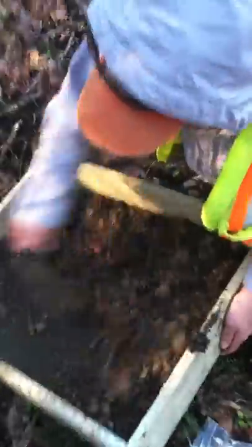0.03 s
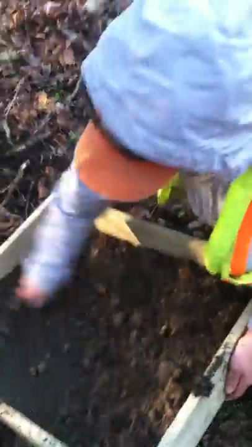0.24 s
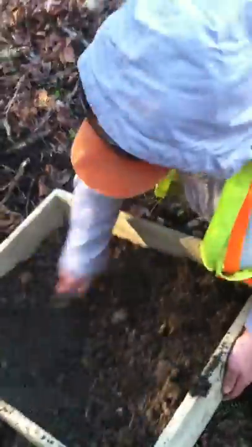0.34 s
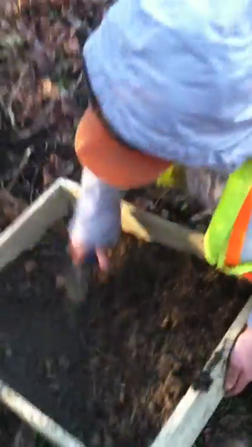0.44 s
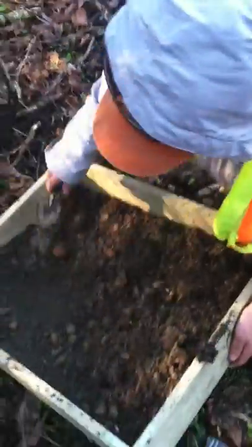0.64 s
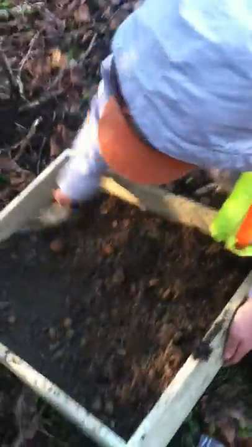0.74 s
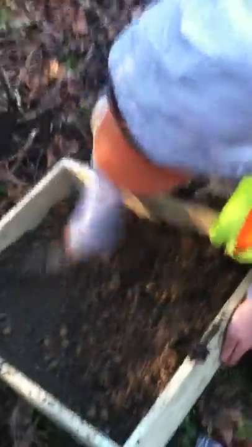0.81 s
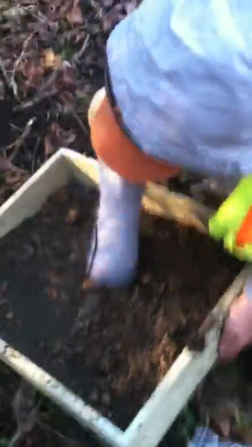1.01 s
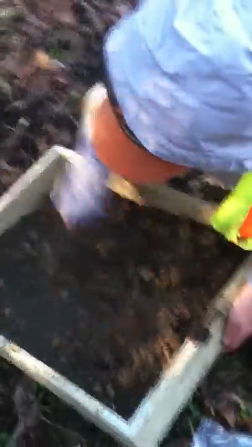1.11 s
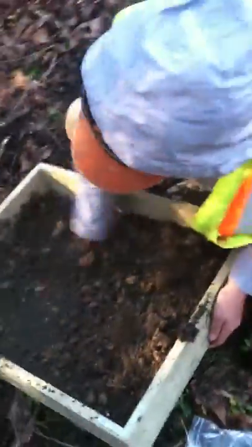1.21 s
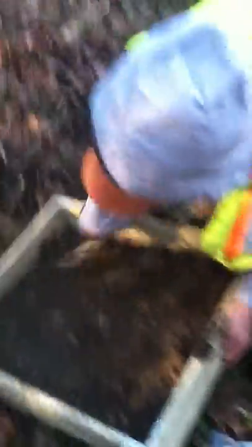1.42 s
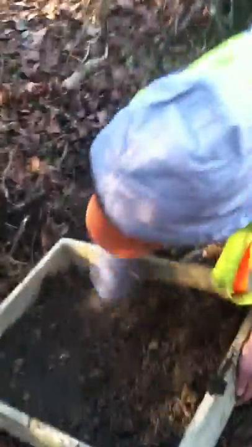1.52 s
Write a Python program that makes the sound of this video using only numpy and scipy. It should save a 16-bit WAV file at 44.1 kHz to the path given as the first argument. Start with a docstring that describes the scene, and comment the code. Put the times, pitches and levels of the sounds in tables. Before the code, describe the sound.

A hand rubs soil across a wood-framed wire screen outdoors. A dull thump at 0.2 seconds leads into a short, hard push at 0.3, crunching crumbs and cracking clods as the screen hums hollowly. A few grains tick in the lull from 0.4 to 0.8. Two longer scraping, rasping sweeps follow at about 0.9 and 1.2, the second softer, fading by 1.4. A distant engine rumbles faintly throughout.

```python
"""Outdoors, over the faint rumble and hum of a far idling engine, a hand rubs damp soil across a wire
screen in a wooden frame. Friction of grit on the mesh excites the screen's modes, which hum hollowly.
First a dull thump rings the screen, and a short hard push crushes crumbs and cracks clods on the wires.
In the lull a few grains tick. Two longer sweeps follow, scraping, crunching and rasping."""
import sys
import numpy as np
from scipy import signal
from scipy.fft import rfft, irfft, next_fast_len
from scipy.io import wavfile
from scipy.ndimage import uniform_filter1d, map_coordinates

SR = 44100
rng = np.random.default_rng(int(sys.argv[2]) if len(sys.argv) > 2 else 0)


def put_to_file(sound):
    """Save the sound as 16-bit audio at rate SR, in the file named by the first command-line argument."""
    columns = np.atleast_2d(sound).T  # one column per channel
    safe = np.clip(columns, -1, 1)
    whole_steps = np.round(safe * 32767)
    wavfile.write(sys.argv[1], SR, whole_steps.astype(np.int16))


N = 68355

# Contact spectra of coarse grit and of fine soil. Each row: frequency in Hz, relative level in dB.
GRIT_SPECTRUM = [(40, -15), (150, -13), (300, -8), (700, -12.5), (950, -6), (1250, -3), (1600, 0),
                 (1950, 3), (2300, 1), (2650, -5), (3050, -1), (3600, -4.5), (3950, -1), (4600, -4.5),
                 (5300, -3.5), (7500, -15.5), (15000, -45)]
SOIL_SPECTRUM = [(100, -50), (1500, -22.5), (3500, 0.5), (5200, -2.5), (7300, 1.5), (10000, 0.5),
                 (11800, -4), (13000, -12), (15500, -23)]
# Normal modes of the framed screen. Each row: frequency in Hz, relative level when struck in dB,
# time to decay by 60 dB in seconds, relative level when scraped in dB.
SCREEN_MODES = [(236, -20.5, 0.12, -11), (330.8, 2, 0.061, -2.5), (553.6, -15, 0.056, -0.5),
                (901.5, -9.5, 0.032, -6), (1220, -14.5, 0.017, -38), (1955, -26, 0.018, -25.5)]


def amp(db):
    """Amplitude ratio of a level in decibels."""
    return 10 ** (np.asarray(db) / 20)


def unit(x):
    """Normalisation to an rms of 1."""
    return x / np.sqrt(np.mean(x ** 2) + 1e-20)


def since(start):
    """Elapsed time in seconds, zero before the start."""
    return np.maximum(np.arange(N) / SR - start, 0)


def wobble(rate):
    """Smooth random modulation: a spline through `rate` knots a second."""
    return map_coordinates(rng.standard_normal(N // 20), [np.arange(N) * rate / SR], mode="wrap")


def filtered(x, response):
    """Linear filtering: the spectrum is multiplied by a frequency response."""
    size = next_fast_len(N + SR // 4)
    return irfft(rfft(x, size) * response(np.fft.rfftfreq(size, 1 / SR)), size)[:N]


def coloured(x, spectrum, size=4096):
    """Convolution with a minimum-phase pulse of unit energy and the given spectral shape."""
    hz, db = np.transpose(spectrum)
    log_hz = np.log(np.fft.rfftfreq(size, 1 / SR) + 1)
    cepstrum = irfft(np.log(amp(np.interp(log_hz, np.log(hz), db))))
    cepstrum[1:size // 2] *= 2  # folding the cepstrum makes the pulse causal
    cepstrum[size // 2 + 1:] = 0
    pulse = irfft(np.exp(rfft(cepstrum)))
    return signal.fftconvolve(x, pulse / np.linalg.norm(pulse))[:N]


def outdoors(rumble_db=-55.5):
    """A far engine's line spectrum, slightly phase-modulated, lies on a continuous low rumble."""
    # Engine partials. Each row: frequency in Hz, level in dB.
    partials = [(133.2, -62.5), (150, -65.5), (166.6, -70), (183.4, -71), (200, -66)]
    # Spectrum of the rumble. Each row: frequency in Hz, relative level in dB.
    spectrum = [(25, -76), (60, -28.5), (100, -19), (120, -16), (160, -10.5), (225, -9), (300, -12.5),
                (430, -11.5), (600, -11.5), (880, -12.5), (1100, -16.5), (1500, -26), (2240, -51),
                (5000, -55), (9000, -46), (15000, -68)]
    hum = sum(amp(db) * unit(np.sin(2 * np.pi * (hz * since(0) + rng.random()) + .5 * wobble(4.3)))
              for hz, db in partials)
    return amp(rumble_db) * unit(coloured(rng.standard_normal(N), spectrum)) + hum


def grains(per_second=4500, spread_db=4, window=220):
    """Shot noise: tiny contacts of random size and sign, their power evened over a few milliseconds."""
    hits = (rng.random(N) < per_second / SR) * np.sign(rng.standard_normal(N))
    hits *= amp(spread_db * rng.standard_normal(N))
    return hits / np.sqrt(np.abs(uniform_filter1d(hits ** 2, window)) + 1e-9)


def rubbing():
    """Stick-slip friction: grit and fine soil drag over the wires and judder together."""
    # Course of the strokes. Each row: time in seconds, level of grit in dB, level of fine soil in dB.
    strokes = [(0, -70, -72.5), (0.131, -72, -77.5), (0.151, -50, -59), (.2, -50, -55.5), (.222, -54, -70),
               (.254, -52.5, -52), (0.291, -49, -46), (0.319, -30, -33.5), (.34, -39.5, -38.5),
               (0.354, -36, -40), (0.367, -46.5, -45.5), (.385, -57.5, -58), (.42, -65, -67),
               (.52, -73, -79.5), (.7, -70.5, -73.5), (.795, -60, -66.5), (.82, -61, -54.5),
               (.88, -50.5, -46.5), (.912, -53, -50), (0.927, -38, -37), (.948, -41.5, -42),
               (0.971, -40.5, -38), (1.01, -43.5, -46), (1.03, -47.5, -44), (1.06, -42, -49.5),
               (1.102, -39, -41), (1.123, -40, -42.5), (1.136, -49.5, -49), (1.165, -53, -53),
               (1.204, -50.5, -56), (1.221, -52.5, -43.5), (1.262, -44.5, -41.5), (1.281, -55.5, -45.5),
               (1.295, -44.5, -43), (1.33, -57, -54), (1.385, -61, -66), (1.45, -57, -67.5),
               (1.519, -61.5, -73), (1.535, -56.5, -54), (1.55, -54, -62)]
    times, *levels = np.transpose(strokes)
    judder_db = 2.0 * wobble(rate=200)
    coarse, fine = (amp(np.interp(since(0), times, db) + judder_db) * grains() for db in levels)
    return coloured(coarse, GRIT_SPECTRUM) + coloured(fine, SOIL_SPECTRUM)


def screen_resonance(scrape, gain_db=12.5):
    """Forced vibration: each mode answers the scraping as a damped second-order resonator."""
    def response(f):
        s = 2j * np.pi * f
        total = 0
        for hz, _, t60, db in SCREEN_MODES:
            damping = 2 * np.log(1000) / t60
            total += amp(db) * s * damping / (s * s + s * damping + (2 * np.pi * hz) ** 2)
        return total
    return amp(gain_db) * filtered(scrape, response)


def screen_hum(hz=328.3, waver_rad=0.86):
    """Sustained oscillation: the pressure of the moving hand keeps the main mode on a wavering note."""
    # Envelope of the note. Each row: time in seconds, level in dB.
    envelope = [(.26, -58), (.305, -42), (.35, -46.5), (.39, -71), (.45, -91), (.84, -75), (.925, -44.5),
                (.97, -52), (1.02, -54), (1.06, -53), (1.125, -46), (1.16, -70), (1.27, -48), (1.34, -82)]
    times, db = np.transpose(envelope)
    phase = 2 * np.pi * hz * since(0) + waver_rad * wobble(rate=25)
    return amp(np.interp(since(0), times, db)) * np.sin(phase)


def clicks(events, spectrum, decay_s):
    """Impact transients: hard contacts give noise bursts of abrupt onset and exponential decay."""
    envelope = sum(amp(db) * (since(start) > 0) * np.exp(-since(start) / decay_s)
                   for start, db in events)
    noise = rng.standard_normal(N)
    local_rms = np.sqrt(np.abs(uniform_filter1d(noise ** 2, 32)))
    return coloured(envelope * noise / local_rms, spectrum)


def grain_ticks():
    """Sudden release: a grain snaps off a wire, and so brief an impulse is rich in treble."""
    # Single grains. Each row: start in seconds, level in dB.
    snaps = [(0.1298, -49), (0.1596, -36), (.185, -38), (.2185, -42), (0.2319, -34), (0.3073, -34),
             (0.3193, -20.5), (0.3727, -40), (0.586, -49), (0.6374, -47), (0.724, -49.5), (0.8078, -30),
             (.83, -49), (0.8455, -37), (0.8505, -32), (1.1721, -39.5), (1.2893, -41), (1.3012, -37)]
    # Spectrum of a tick. Each row: frequency in Hz, relative level in dB.
    spectrum = [(200, -19), (2000, -7.5), (4000, 1), (6000, 3.5), (10000, 1.5), (12500, -18), (15500, -21)]
    return clicks(snaps, spectrum, decay_s=0.001)


def hand_thumps():
    """Free vibration: blows ring the soil-damped modes, and harder contact favours the higher ones."""
    # Blows of the hand. Each row: start in seconds, level in dB, rise time of the main mode in seconds,
    # hardness in dB per octave, extra level of the woody mode in dB (set by the spot struck).
    blows = [(0.149, -37.5, 0.0026, 8.5, 8), (.2043, -11, 0.0031, -0.5, 0.5),
             (0.276, -32.5, 0.0028, -4, -2), (.304, -35, 0.0036, -3, 17), (.315, -36.5, 0.0025, 0, 22),
             (.354, -28.5, 0.00097, 3.5, -1), (.92, -32, 0.0052, 2, 2), (.932, -52.5, .003, 6.5, 26.5),
             (.96, -37.5, 0.0044, 0, 0), (1.047, -35, .002, -1, 1), (1.099, -41, 0.0029, 3, 25),
             (1.122, -40, 0.0018, -12, 8), (1.19, -40.5, 0.0023, 8, -3), (1.245, -38, 0.0019, -7, 2),
             (1.275, -40, 0.003, -10, 3)]
    main_hz, woody_hz = SCREEN_MODES[1][0], SCREEN_MODES[2][0]
    out = np.zeros(N)
    for start, db, rise, hardness, woody_db in blows:
        t = since(start)
        for hz, mode_db, t60, _ in SCREEN_MODES:
            polarity = -1 if hz < main_hz else 1  # the lowest mode swings against the others
            weight_db = mode_db + hardness * np.log2(hz / main_hz) + woody_db * (hz == woody_hz)
            attack = 1 - np.exp(-t * hz / (rise * main_hz))  # higher modes speak sooner
            out += amp(db + weight_db - 60 * t / t60) * attack * polarity * np.sin(2 * np.pi * hz * t)
    return out


def swell(start, rise):
    """A critically damped envelope: it reaches 1 after `rise` seconds, then dies away."""
    u = since(start) / rise
    return u * np.exp(1 - u)


def palm_puffs(hz=45.5, rise_s=0.0083):
    """Volume displacement: the palm shoves the soil and pushes out a faint, deep pulse of air."""
    # Shoves of the palm. Each row: start in seconds, level in dB.
    shoves = [(.15, -70), (.21, -59), (.27, -65), (.342, -65), (.945, -60), (1.04, -71)]
    return sum(amp(db) * swell(start, rise_s) * np.sin(2 * np.pi * hz * since(start))
               for start, db in shoves)


def crumb_crunches():
    """Fracture noise: each crumb collapses against the mesh in a brief, dense burst of grains."""
    # Crushed crumbs. Each row: start in seconds, level in dB, length in seconds,
    # level of fine soil relative to grit in dB.
    crumbs = [(0.151, -39, 0.0046, -5.5), (0.16, -41.5, 0.0029, 7), (0.171, -44, 0.003, -2),
              (0.1846, -41, 0.0025, 12), (0.204, -43.5, 0.003, 1), (0.2298, -36, 0.0082, 19),
              (0.234, -38, 0.0029, 17), (0.258, -35.5, 0.003, 4), (0.2652, -34.5, 0.005, 11),
              (0.279, -37.5, 0.0076, -7), (0.2929, -30, 0.0028, 4), (0.2993, -32, 0.0039, -1),
              (0.3048, -26.5, 0.0039, 1.5), (0.3148, -25.5, 0.0031, -12), (0.324, -24, 0.002, -3),
              (0.3286, -28, 0.0032, -27), (0.3416, -31.5, 0.0049, 1.5), (0.35, -27.5, 0.0043, -5.5),
              (0.459, -58.5, 0.0042, -10), (0.87, -60, 0.0033, -8), (0.889, -38.5, 0.0064, 11),
              (0.903, -40, 0.0042, 8), (0.9373, -32.5, 0.0028, -7), (.954, -35, 0.0035, -7),
              (0.996, -35.5, 0.0025, -13), (1.022, -36.5, 0.0056, 5), (1.032, -34, 0.0035, -5),
              (1.046, -33, 0.0038, -7), (1.055, -52, 0.0027, -11), (1.0757, -38, 0.0027, -3),
              (1.079, -33.5, 0.0051, -3), (1.095, -33, 0.0054, -1.5), (1.1075, -38, 0.0027, -14),
              (1.1205, -37.5, 0.0034, 20), (1.1533, -42, 0.0021, 7), (1.229, -38.5, 0.0041, -4),
              (1.286, -42.5, .005, -3), (1.311, -41.5, 0.005, 23), (1.407, -50.5, 0.0025, 2),
              (1.4574, -48, 0.0029, -4)]
    coarse_power, fine_power = np.zeros(N), np.zeros(N)
    for start, db, length, fine_db in crumbs:
        fine_ratio = amp(fine_db) ** 2
        power = (amp(db) * swell(start, rise=length / 2)) ** 2 / (1 + fine_ratio)
        coarse_power += power
        fine_power += power * fine_ratio
    coarse = coloured(np.sqrt(coarse_power) * grains(), GRIT_SPECTRUM)
    fine = coloured(np.sqrt(fine_power) * grains(), SOIL_SPECTRUM)
    return coarse + fine


def clod_cracks():
    """Hard impact: small stones and clods strike the wires with a dry, broadband crack."""
    # Stones and clods. Each row: start in seconds, level in dB.
    impacts = [(.1968, -33.5), (.2055, -32), (.2948, -31), (.3074, -18.5), (.3194, -20), (.3243, -40),
               (.3274, -21), (.3308, -25), (.9378, -21), (1.0982, -24), (1.1033, -35), (1.1902, -23.5),
               (1.2335, -36), (1.2885, -31)]
    # Spectrum of a crack. Each row: frequency in Hz, relative level in dB.
    spectrum = [(150, -20.5), (600, -8), (1000, -0.5), (1600, 2.5), (2600, -2), (4500, -0.5), (5800, -14),
                (10000, -23), (15000, -41)]
    return clicks(impacts, spectrum, decay_s=0.00082)


def mesh_rasps():
    """Narrow-band friction noise: grit slips along the wires, giving a randomly modulated tone."""
    # Slips of grit. Each row: start in seconds, level in dB, rise time in seconds,
    # centre frequency in Hz, bandwidth in Hz.
    slips = [(.235, -38, 0.0026, 1896, 504.6), (.262, -38.5, 0.0036, 1955, 397),
             (0.292, -32.5, .002, 1940, 450), (.306, -28.5, 0.0018, 1857, 600),
             (0.281, -31.5, 0.0016, 9470, 1198), (.392, -52, 0.0027, 1800, 400),
             (.92, -45, 0.008, 1882, 500), (0.956, -46.5, 0.004, 1930, 404), (.96, -39, 0.0077, 7260, 500),
             (.97, -38.5, 0.0075, 5730, 600), (1.0, -44, 0.018, 2196, 449.7),
             (1.066, -43, 0.0069, 3300, 495), (1.072, -38, 0.0074, 1948, 450), (1.09, -43, .004, 9700, 500),
             (1.0955, -27.5, 0.0025, 3208, 498), (1.096, -32, 0.0034, 1920, 606),
             (1.1898, -34, 0.0013, 1480, 900), (1.219, -38, 0.0031, 4340, 654),
             (1.25, -41.5, 0.0056, 4270, 790), (1.2865, -37, 0.0029, 4000, 745),
             (1.314, -39.5, 0.0021, 4220, 602)]
    out = np.zeros(N)
    for start, db, rise, hz, width_hz in slips:
        envelope = swell(start, rise)
        phase = 2 * np.pi * hz * since(start)
        band = envelope * (wobble(width_hz) * np.sin(phase) + wobble(width_hz) * np.cos(phase))
        out += amp(db) * band * np.linalg.norm(envelope) / np.linalg.norm(band)
    return out


def scene(low_cut_hz=217):
    """Superposition of screen, puffs and background; the open mesh radiates bass poorly."""
    scrape = rubbing() + crumb_crunches()
    screen = scrape + screen_resonance(scrape) + grain_ticks() + clod_cracks()
    screen += hand_thumps() + screen_hum() + mesh_rasps()
    radiated = signal.sosfilt(signal.butter(5, low_cut_hz, "high", fs=SR, output="sos"), screen)
    return (radiated + palm_puffs() + outdoors())[None]


def record(dry, top_hz=15800):
    """Band limiting: an ideal low-pass filter removes the highest treble."""
    return filtered(dry[0], lambda hz: hz < top_hz)[None]


dry = scene()
out = record(dry)
put_to_file(out)
```